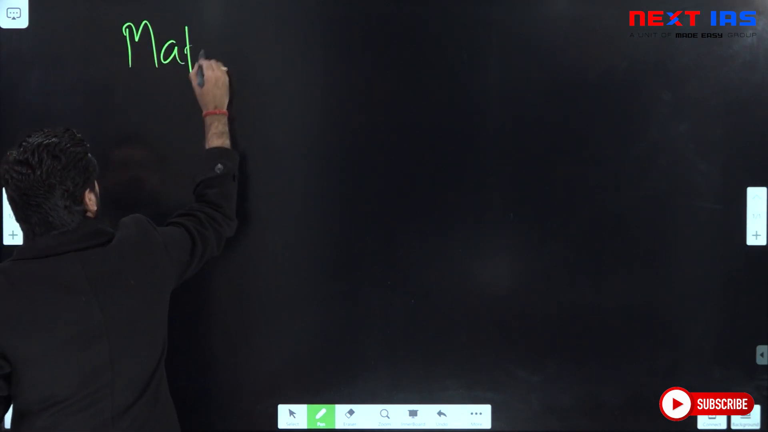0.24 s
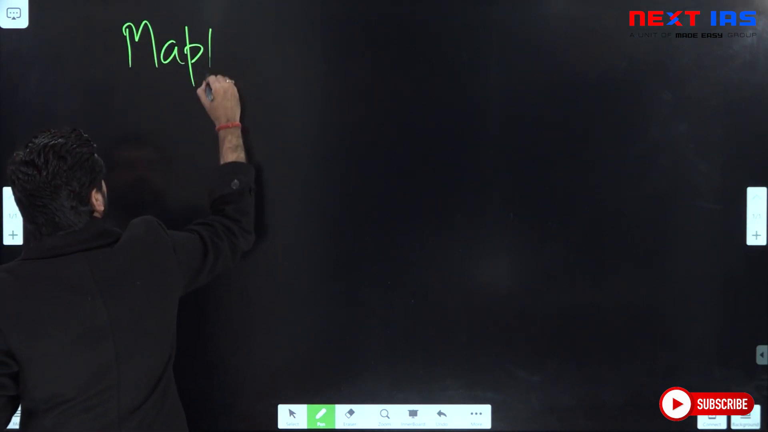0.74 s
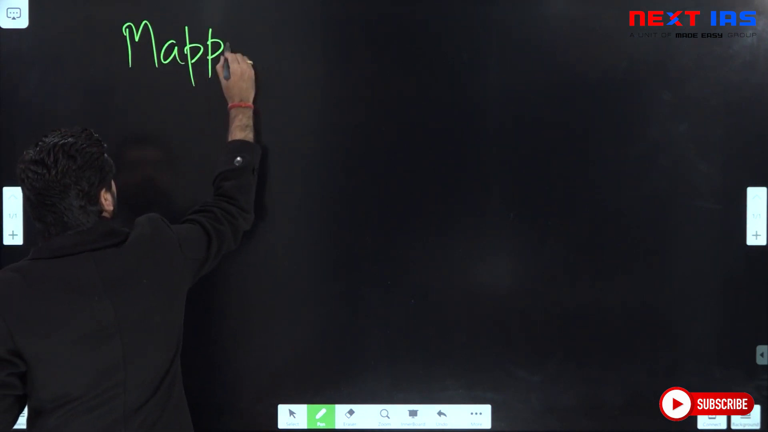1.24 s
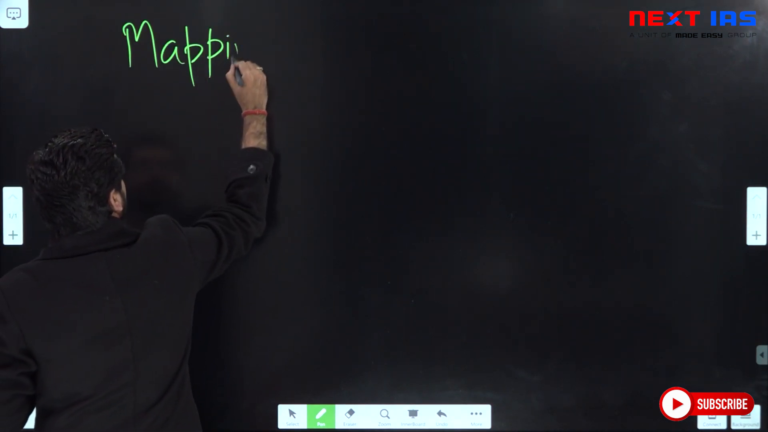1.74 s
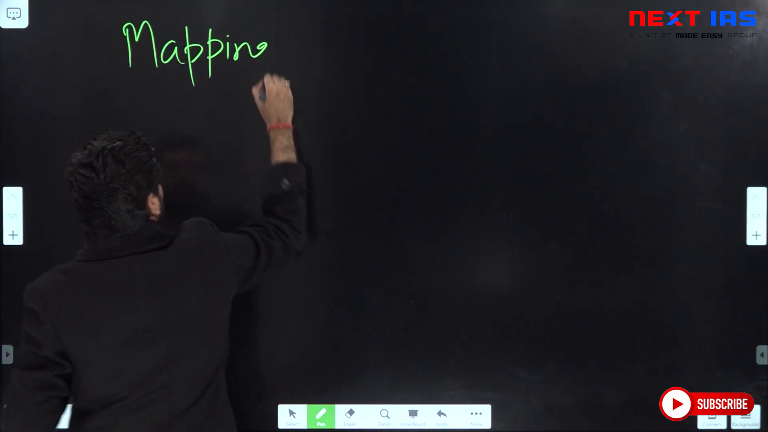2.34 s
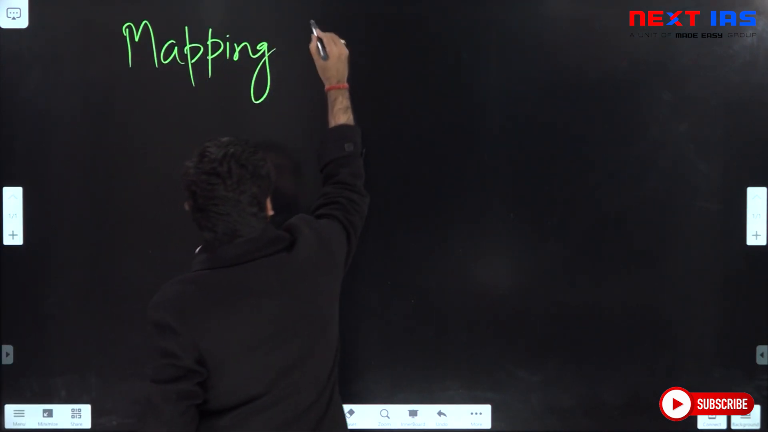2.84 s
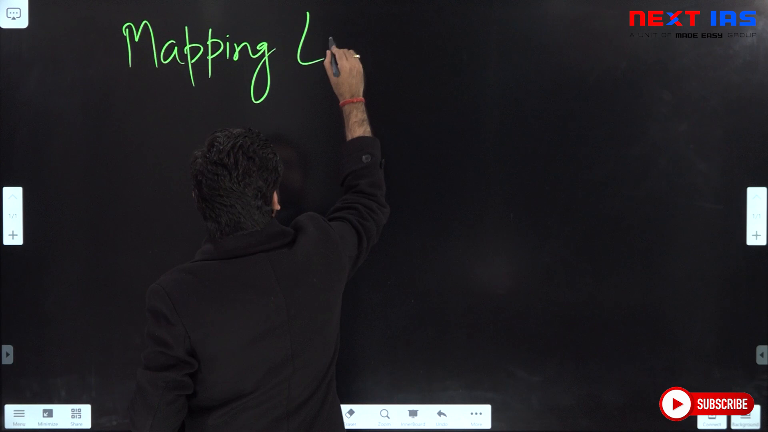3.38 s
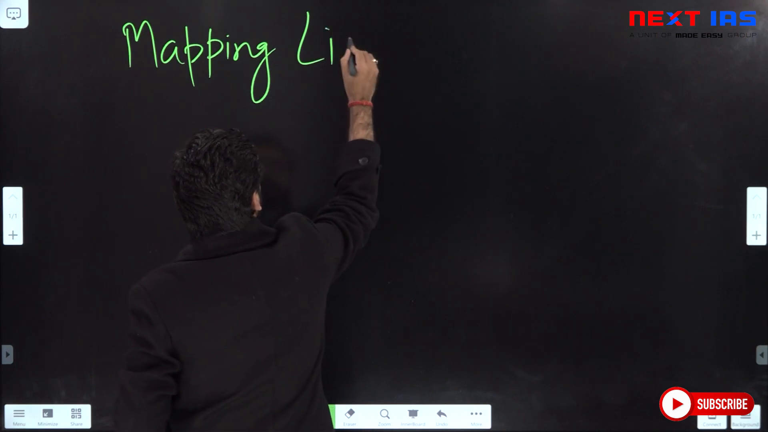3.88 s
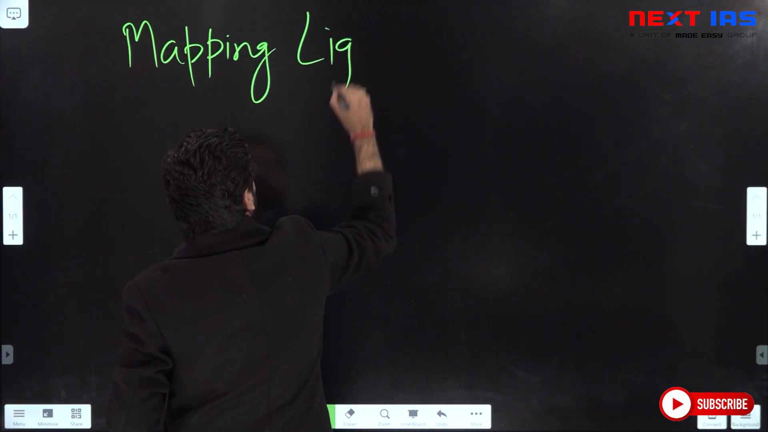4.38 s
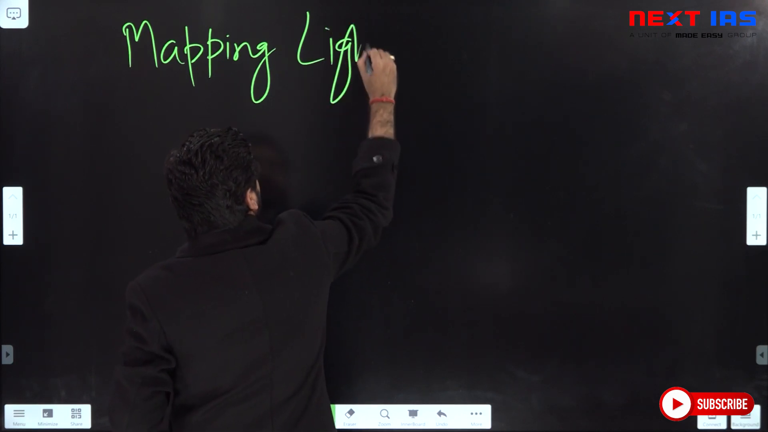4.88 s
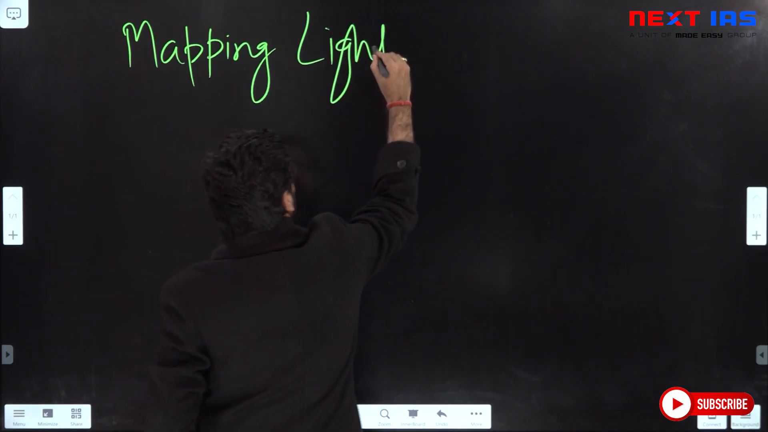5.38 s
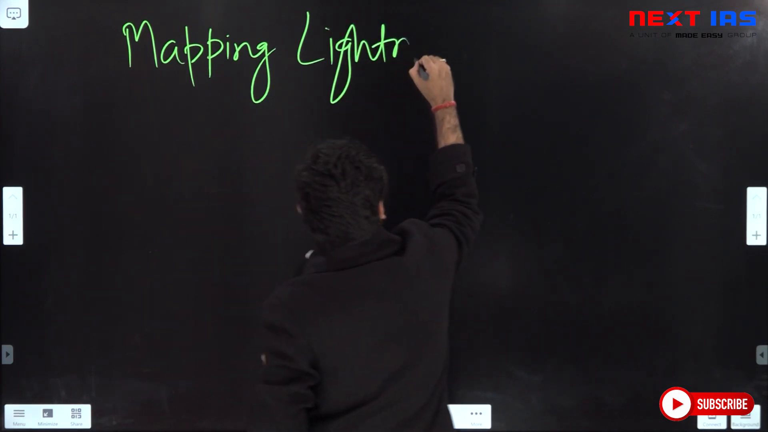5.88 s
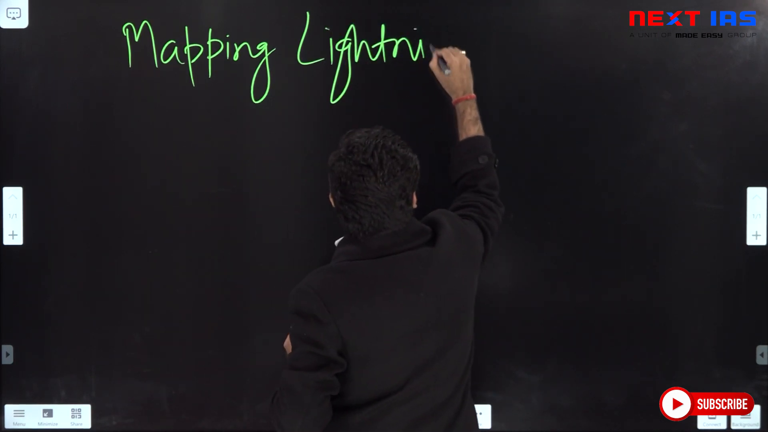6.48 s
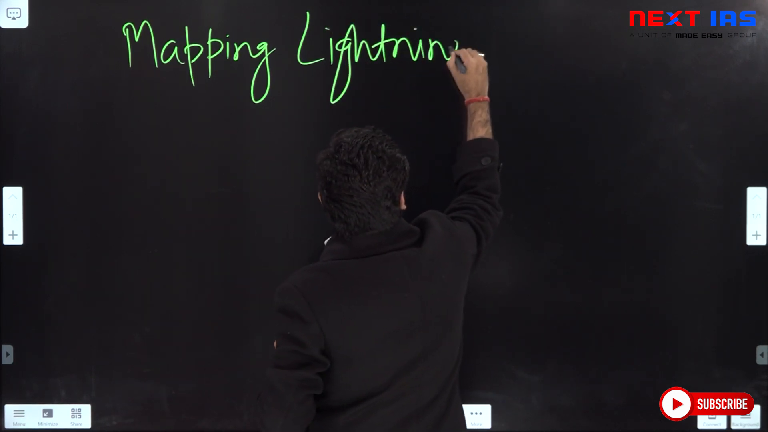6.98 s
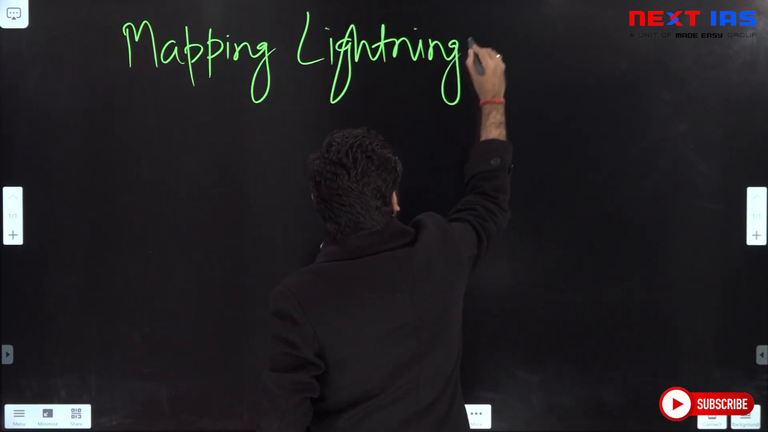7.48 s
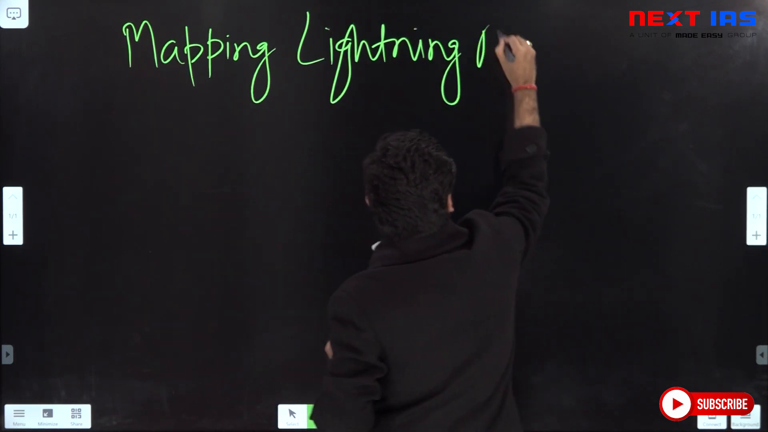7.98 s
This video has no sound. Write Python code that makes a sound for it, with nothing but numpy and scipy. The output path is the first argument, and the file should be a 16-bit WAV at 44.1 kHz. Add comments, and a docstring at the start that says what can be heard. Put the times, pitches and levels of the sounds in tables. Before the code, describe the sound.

Irregular hollow taps and soft, thin scratches of a stylus writing on a large glass screen, over quiet ventilation.

```python
"""A plastic stylus writes on the glass of a large wall display, near a microphone in a small room.
Each landing knocks the panel, ticks on the glass and rings the casing; each stroke hisses as tiny
slips excite the resonances of the tip. A sleeve brushes once. The room answers the landings,
over ventilation noise and a thin whine from the electronics."""
import sys
import numpy as np
from scipy import signal
from scipy.fft import rfft, irfft, next_fast_len
from scipy.io import wavfile
from scipy.ndimage import uniform_filter1d, map_coordinates

SR = 44100
rng = np.random.default_rng(int(sys.argv[2]) if len(sys.argv) > 2 else 0)


def dump(signal):
    """Clip the signal to [-1, 1] and save it as 16-bit WAV at the path in sys.argv[1]."""
    limited = np.clip(np.atleast_2d(signal).T, -1, 1)
    pcm = np.round(limited * 32767).astype(np.int16)
    wavfile.write(sys.argv[1], SR, pcm)


N = 362943

# landings: t/s, level/dB, struck spot f/Hz, boom/dB, tick/dB (last two re level)
LANDINGS = [(0.133, -15, 529, -22, -37), (0.555, -19, 417, -21, -30.5), (0.921, -20.5, 486, -21.5, -43),
            (1.263, -17, 636, -16, -25), (1.512, -11, 616, -21, -29.5), (1.656, -17, 705, -21.5, -19),
            (2.494, -44.5, 320, -12.5, -12), (2.954, -14, 632, -22.5, -36), (3.429, -10, 615, -19.5, -29.5),
            (3.74, -7.5, 624, -21.5, -27), (3.919, -15, 598, -19, -24.5), (5.457, -16.5, 588, -13.5, -28.5),
            (5.981, -28.5, 567, -12, -32), (6.3176, -9, 578, -20, -31), (6.495, -13.5, 578, -16.5, -17.5),
            (6.889, -27.5, 593, -10, -34), (7.339, -39.5, 294, -9.5, -15),
            (7.653, -15.5, 595, -14.5, -28.5)]
def landings():
    """The stylus hits the glass: knock, contact noise and casing boom."""
    out = np.zeros(N + SR)
    t = np.arange(SR * 4 // 5) / SR
    for onset_s, level_db, spot_hz, boom_db, tick_db in LANDINGS:
        knock = panel_knock(t, level_db, spot_hz)
        contact = contact_noise(t, level_db, tick_db)
        boom = amp(boom_db) * casing_boom(t, onset_s)
        out[round(onset_s * SR):][:len(t)] += amp(level_db) * (knock + contact + boom)
    return out[:N]


# glass panel modes: f/Hz, level/dB, t60/s
PANEL_MODES = [(274, -7.5, 0.054), (425, 1.5, 0.022), (555.5, 10.5, 0.015), (698, 1.5, 0.017),
               (861, -5, 0.022), (1224, -4, 0.018)]
def panel_knock(t, level_db, spot_hz, bend_s=0.0004):
    """The glass bends, ringing panel and struck spot. Light blows last longer and sound duller."""
    ring_s = np.maximum(t - bend_s, 0)
    panel = ringing(PANEL_MODES, ring_s, scatter_db=3.5, attack_s=0.00066)
    spot = ringing([(spot_hz, 5.5, 0.055)], ring_s, scatter_db=2, attack_s=0.001)
    cutoff_hz = 2800 * amp(0.32 * level_db)

    def response(hz):  # bare glass radiates little bass
        return highpass(hz, 160) / (1 - (hz / cutoff_hz) ** 2 + 1.3j * hz / cutoff_hz) ** 2

    wet_db = -3.5 - 0.3 * max(level_db, -17.5)  # lighter blows are wetter
    knock = room(panel, wet_db) + spot  # spot faces the microphone: dry
    dry_peak = np.abs(filtered(panel + spot, response)).max()
    return filtered(knock, response) / dry_peak


# contact spectra: f/Hz, density/dB
CLACK_SPECTRUM = [(1200, -30.5), (1700, -3.5), (2400, 1), (3200, -13.5), (4200, -9), (6000, -33)]
TICK_SPECTRUM = [(2500, -26.5), (4200, -10.5), (5200, 3), (6000, 0.5), (7000, -8.5), (9000, -6),
                 (12000, -22.5), (16000, -22)]
def contact_noise(t, level_db, tick_db):
    """Plastic meets glass: a thin tick, and a hard clack that grows with tick and blow."""
    clack_db = -3.5 + 0.72 * tick_db + 0.31 * level_db
    clack = amp(clack_db) * decay(t, t60_s=0.01) * noise(CLACK_SPECTRUM, len(t))
    crack = amp(-2) * decay(t, t60_s=0.003)
    tick = amp(tick_db) * (decay(t, t60_s=0.024) + crack) * noise(TICK_SPECTRUM, len(t))
    return room(clack, wet_db=4.5) + room(tick, wet_db=-4)


# dense casing ring: f/Hz, density/dB
BOOM_SPECTRUM = [(60, -35), (110, 1.5), (150, 2.5), (200, 13), (280, 13), (400, 6.5), (600, -41.5)]
# casing modes: f/Hz, level/dB, t60/s
CASING_MODES = [(123.04, -17, 0.86), (181.3, -4.5, 0.67), (366, -1.5, 0.48)]
# drive of the highest casing mode as the hand moves: t/s, gain/dB
UPPER_MODE_DRIVE = [(0.1, 0), (1.3, 2.5), (2.9, 3.5), (3.7, 6.5), (5.5, -4.5), (6.3, 0), (6.9, 5),
                    (7.7, 2.5)]
def casing_boom(t, onset_s, deep_db_per_s=0.92):
    """The casing rings low; its deepest mode gains as the writing nears mid-panel."""
    dense = decay(t, t60_s=0.58) * (1 - np.exp(-t / 0.013)) * noise(BOOM_SPECTRUM, len(t))
    drives_db = [deep_db_per_s * onset_s, 0, np.interp(onset_s, *np.transpose(UPPER_MODE_DRIVE))]
    modes = [(hz, db + drive_db, t60_s) for (hz, db, t60_s), drive_db in zip(CASING_MODES, drives_db)]
    return dense + ringing(modes, t, scatter_db=2.5, attack_s=0.018)


# strokes: start/s, end/s, level/dB, growth/dB, tint (-1 low tip modes, +1 middle)
STROKE_GESTURES = [(0.152, 0.358, -53.5, 8, -.2), (0.625, 0.764, -53.5, -0.5, -0.24),
                   (0.928, 1.119, -52.5, 11, -0.18), (1.303, 1.367, -53.5, -1.5, -.2),
                   (1.52, 1.57, -62, -28, -0.23), (1.66, 1.788, -55, -5, -0.13),
                   (1.82, 1.995, -55, -5, -.1), (2.018, 2.063, -52.5, 5, 0.23),
                   (2.117, 2.164, -53.5, -2, .3), (2.205, 2.252, -56, -7, 0.098),
                   (2.309, 2.457, -51, 8, -0.18), (2.511, 2.624, -47.5, 0, -0.34),
                   (2.952, 3.02, -56.5, -3, .3), (3.036, 3.261, -53, 9, 0.15),
                   (3.476, 3.554, -53.5, 6.5, -0.34), (3.79, 3.77, -50, -7, -.5),
                   (3.97, 4.027, -51.5, 0, 0.026), (4.06, 4.128, -55, 0, 0.13),
                   (4.195, 4.339, -52.5, 13, -0.092), (4.375, 4.385, -60, 0, -0.25),
                   (4.408, 4.58, -50, -2, -0.31), (4.641, 4.75, -54.5, -1, 0.25),
                   (4.808, 4.896, -58, -4, -0.24), (4.927, 5.022, -57.5, -0.5, -0.3),
                   (5.045, 5.143, -53.5, -2.5, 0.43), (5.214, 5.309, -53, 1.5, 0.78),
                   (5.507, 5.668, -56, -4, 0.13), (5.726, 5.814, -58.5, 4, -0.17),
                   (5.847, 5.907, -57.5, 5, -0.45), (5.988, 6.052, -62, -10, -0.14),
                   (6.092, 6.147, -55, 4.5, -0.33), (6.53, 6.6, -53, 2, -0.18),
                   (6.65, 6.819, -53, 4, -0.56), (6.897, 7.096, -59.5, -13, -0.31),
                   (7.165, 7.288, -50, 5.5, -.5), (7.353, 7.451, -50, -9.5, 0.043),
                   (7.703, 7.8, -57, 13, -.1), (7.84, 8.006, -57.5, -7, -0.26),
                   (8.02, 8.118, -58.5, 4, -0.22)]
# per tip mode group: level/dB at tint 0; gain/dB per unit tint
GROUP_LEVELS_DB = [-2.5, 1, 2.5, -5.5]
GROUP_TINTS_DB = [-2.5, -2, 12, -1]
def strokes(rise_s=0.026, fall_s=0.049, arch_db=2):
    """The sliding tip catches on the glass in dense tiny slips that ring tip and barrel."""
    slips = rng.standard_normal(N) * amp(1.42 * rng.exponential(size=N) + 0.5 * wobble(150))
    hz, t, slip_stft = signal.stft(unit(slips), SR, nperseg=256)
    envelope = np.zeros(len(t))
    group_gains = np.zeros((len(GROUP_LEVELS_DB), len(t)))
    for start_s, end_s, level_db, growth_db, tint in STROKE_GESTURES:
        place = np.clip((t - start_s) / (end_s - start_s), 0, 1) - 0.5
        fade = np.clip(np.minimum((t - start_s) / rise_s, (end_s - t) / fall_s) + 1, 0, 1) ** 2
        gain = fade * amp(level_db + growth_db * place - arch_db * (2 * place) ** 2)  # fastest mid-stroke
        envelope += gain
        group_gains += gain * amp(np.add(GROUP_LEVELS_DB, tint * np.array(GROUP_TINTS_DB)))[:, None]
    colour = tip_colour(hz[:, None], t, group_gains)
    pressure = amp(1.1 * wobble_at(t, 30))
    response = envelope * pressure * colour + barrel_squeak(hz[:, None], t, envelope)
    return signal.istft(slip_stft * response, SR, nperseg=256)[1][:N]


# tip modes, four groups: f/Hz, width/Hz, level/dB
TIP_MODE_GROUPS = [
    [(6507, 510, 2), (5100, 460, -18)],
    [(7250, 430, 3), (8000, 1100, -2.5)],
    [(10460, 1900, 4.5), (10860, 900, 0), (11800, 660, -11)],
    [(12600, 610, -6.5), (13540, 1200, -2), (14900, 1400, -7)],
]
def tip_colour(hz, t, group_gains):
    """Tip response per frame. Modes shift as the hand turns; the grip varies the fine colour."""
    power = 1e-12
    for modes, gain in zip(TIP_MODE_GROUPS, group_gains):
        bent_hz = hz * (1 + 0.012 * wobble_at(t, 14))
        group_power = 0
        for mode_hz, width_hz, db in modes:
            peak = amp(db + 2.2 * wobble_at(t, 14)) * resonance(bent_hz - mode_hz, width_hz) ** 0.9
            group_power += peak ** 2
        power += gain ** 2 * group_power / group_power.mean()
    grip = uniform_filter1d(rng.standard_normal(power.shape), size=2, axis=0)
    grip = uniform_filter1d(grip, size=16, axis=1)
    power *= amp(6.5 * unit(grip))
    return np.sqrt(power / power.mean(0))


def barrel_squeak(hz, t, envelope, mode_hz=4480, width_hz=70):
    """Response of a narrow barrel mode that sings under any stroke, however light."""
    gain = amp(-77.5 + 2 * wobble_at(t, 7.7)) * np.sqrt(SR / width_hz)
    centre_hz = mode_hz + 120 * wobble_at(t, 6.6)
    return gain * resonance(hz - centre_hz, width_hz) * (envelope / envelope.max()) ** 0.11


# cloth friction: f/Hz, density/dB
CLOTH_SPECTRUM = [(300, -31), (900, -9.5), (1500, -8.5), (3200, -13), (6000, -21), (12000, -18),
                  (16000, -23)]
# brush: start/s, loudest/s, end/s
BRUSH_TIMES_S = (2.7, 2.85, 3.0)
def sleeve():
    """Cloth brushes as the arm moves to the next word."""
    swell_db = np.interp(np.arange(N) / SR, BRUSH_TIMES_S, [-73, -60.5, -73], left=-120, right=-120)
    return amp(swell_db + 2.8 * wobble(64)) * noise(CLOTH_SPECTRUM, N)


# ventilation: f/Hz, density/dB
AIR_SPECTRUM = [(15, -35), (25, 4.5), (170, -3.5), (840, -11), (936, -7.5), (1040, -12.5), (1560, -15.5),
                (3080, -20), (5730, -23), (7710, -22.5), (14000, -25.5), (16000, -23.5)]
def ventilation(level_db=-61.5):
    """Moving air, drifting slightly in level."""
    return amp(level_db + 0.6 * wobble(3)) * noise(AIR_SPECTRUM, N)


def electronics_whine(hz=13884, level_db=-88):
    """A thin tone from the electronics, wavering in level and phase."""
    gain = np.sqrt(2) * amp(level_db + 3.9 * wobble(5))
    return gain * np.sin(2 * np.pi * hz * np.arange(N) / SR + 1.1 * wobble(24))


# room decay: f/Hz, t60/s
ROOM_DECAY = [(80, 0.34), (210, 0.49), (560, 0.39), (1470, 0.26), (3880, 0.19)]
def room(x, wet_db, build_s=0.0037):
    """x plus a fresh diffuse tail; each frequency dies at its own rate."""
    hz, t, noise_stft = signal.stft(rng.standard_normal(len(x)), SR, nperseg=256)
    t60_s = log_interp(ROOM_DECAY, hz)[:, None]
    tail = signal.istft(noise_stft * decay(t, t60_s), SR, nperseg=256)[1][:len(x)]
    tail *= np.clip(np.arange(len(tail)) / SR / build_s, 0, 1) ** 2  # walls take a moment to answer
    return x + amp(wet_db) * signal.fftconvolve(x, tail / np.linalg.norm(tail))[:len(x)]


def ringing(modes, t, scatter_db, attack_s):
    """Damped modes at randomly scattered levels."""
    out = np.zeros(len(t))
    for hz, db, t60_s in modes:
        gain = amp(db + scatter_db * rng.standard_normal())
        out -= gain * decay(t, t60_s) * np.sin(2 * np.pi * hz * t)
    return out * (1 - np.exp(-t / attack_s))


def noise(spectrum, size):
    """Coloured noise, rms 1."""
    return unit(filtered(rng.standard_normal(size), lambda hz: amp(log_interp(spectrum, hz))))


def wobble(knots_per_s):
    """Smooth random curve, N samples."""
    knots = rng.standard_normal(int(N * knots_per_s / SR) + 4)
    return map_coordinates(knots, [np.arange(N) * knots_per_s / SR])


def wobble_at(t, knots_per_s):
    return np.interp(t * SR, np.arange(N), wobble(knots_per_s))


def filtered(x, response):
    """x through a complex frequency response."""
    size = next_fast_len(len(x) + 8192)
    return irfft(rfft(x, size) * response(np.fft.rfftfreq(size, 1 / SR)), size)[:len(x)]


def highpass(hz, corner_hz):
    return (1j * hz / (corner_hz + 1j * hz)) ** 2


def resonance(offset_hz, width_hz):
    return 1 / (1 + (2 * offset_hz / width_hz) ** 2)


def log_interp(points, hz):
    points_hz, values = np.transpose(points)
    return np.interp(np.log(hz + 1), np.log(points_hz + 1), values)


def decay(t, t60_s):
    return amp(-60 * t / t60_s)


def amp(db):
    return 10 ** (np.asarray(db) / 20)


def unit(x):
    """x at rms 1."""
    return x / np.sqrt(np.mean(x ** 2) + 1e-20)


def scene():
    """All sources, mono."""
    return (landings() + strokes() + sleeve() + electronics_whine() + ventilation())[None]


def record(dry):
    """Microphone bass roll-off and a steep treble limit."""
    bass_hz, top_hz = 90, 15750
    response = lambda hz: highpass(hz, bass_hz) * amp(-np.clip((hz - top_hz) / 4, 0, 90))
    return filtered(dry[0], response)[None]


dry = scene()
out = record(dry)
dump(out)
```